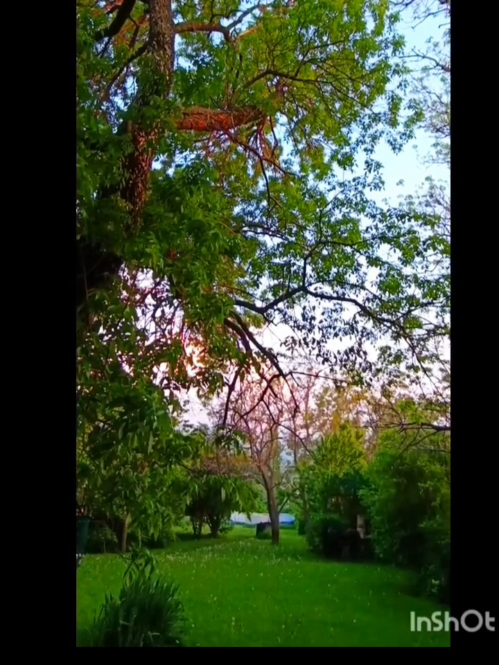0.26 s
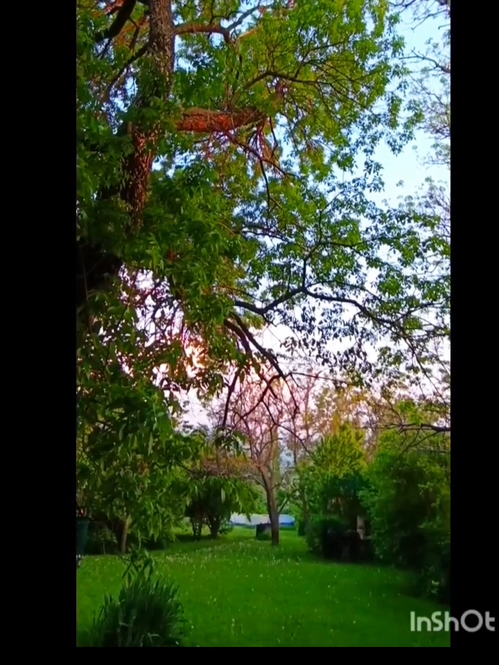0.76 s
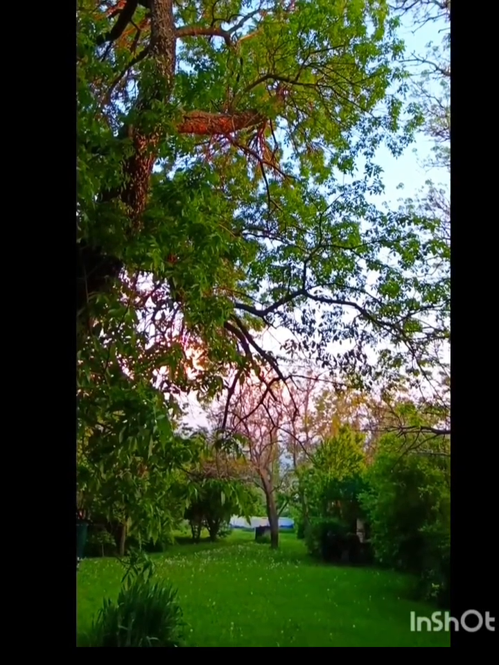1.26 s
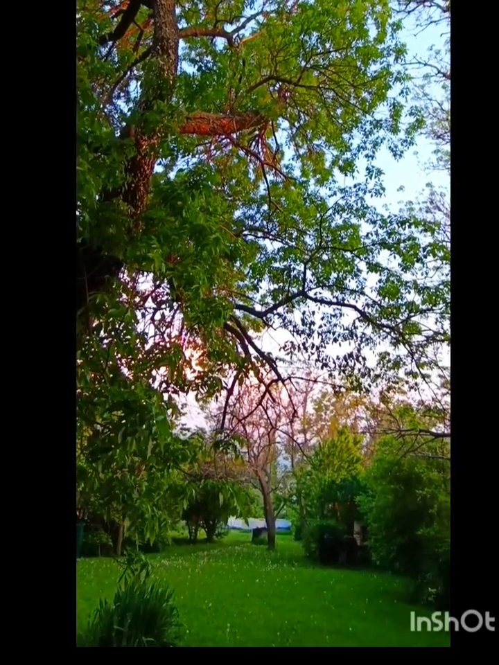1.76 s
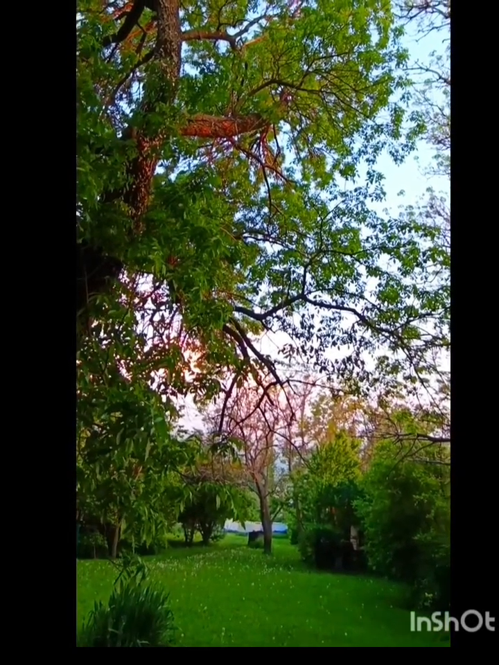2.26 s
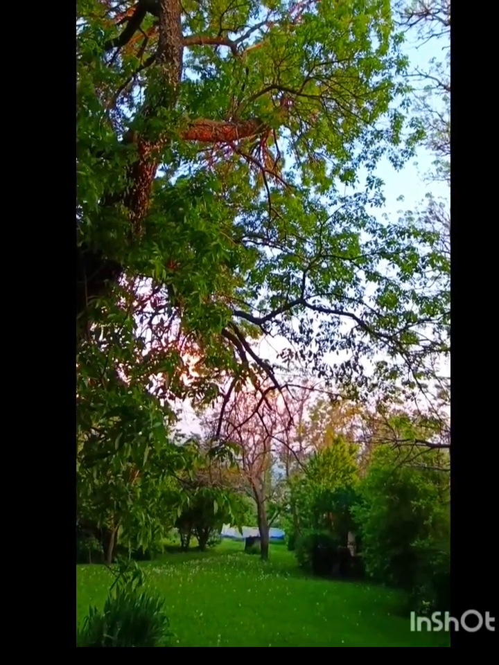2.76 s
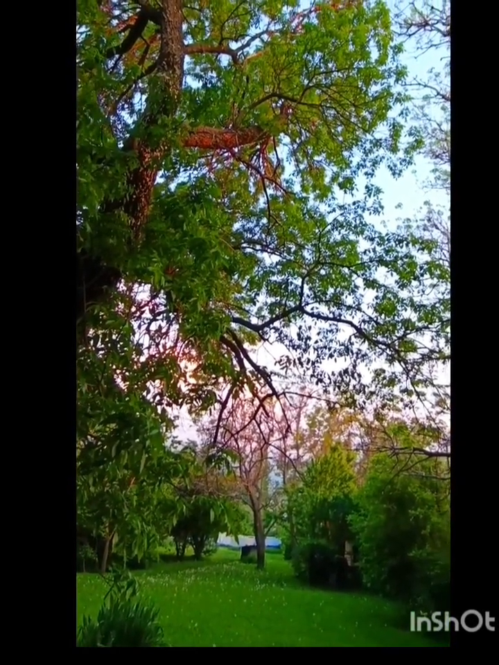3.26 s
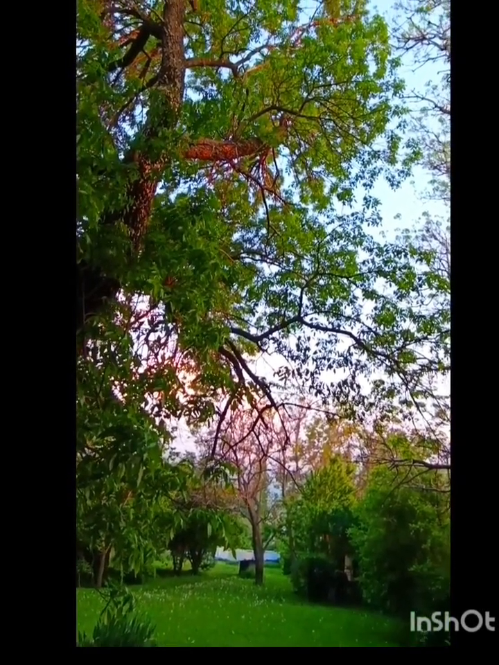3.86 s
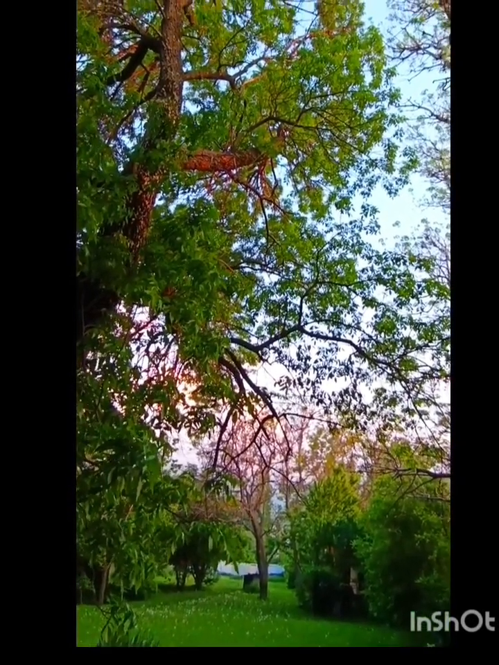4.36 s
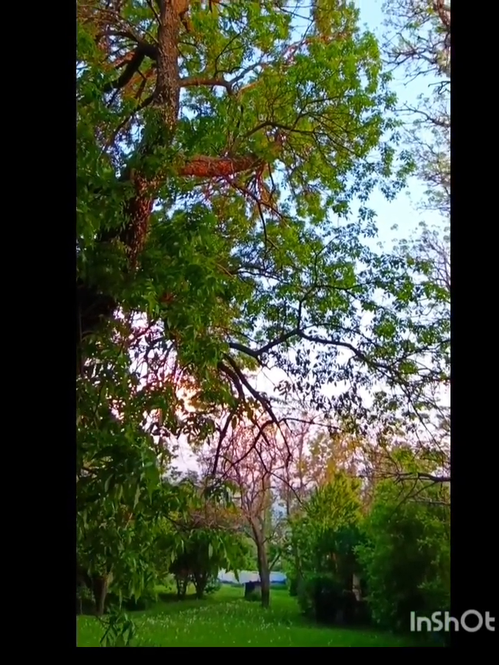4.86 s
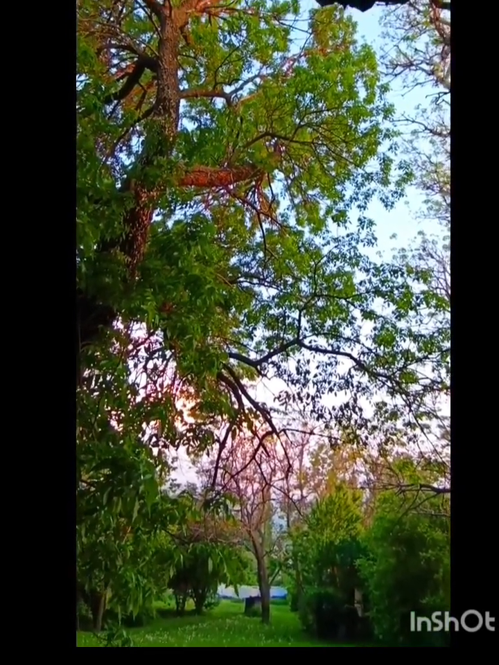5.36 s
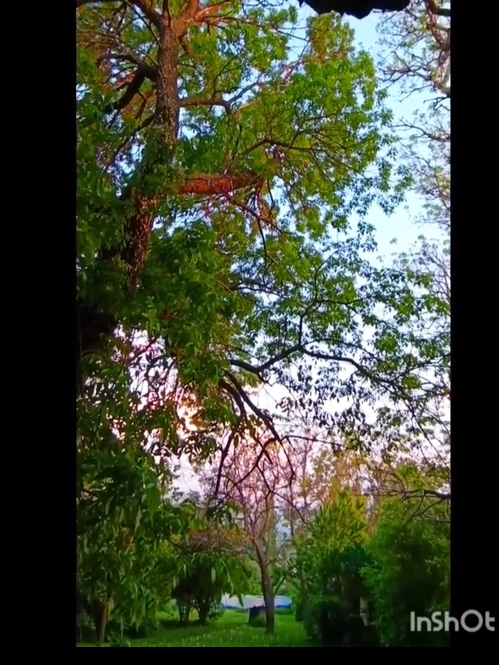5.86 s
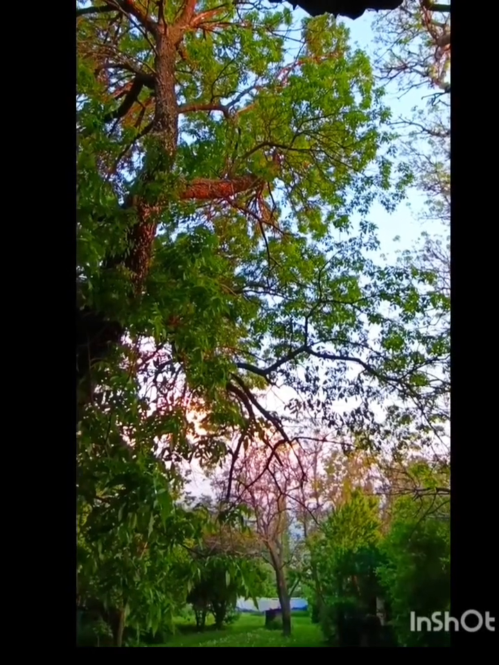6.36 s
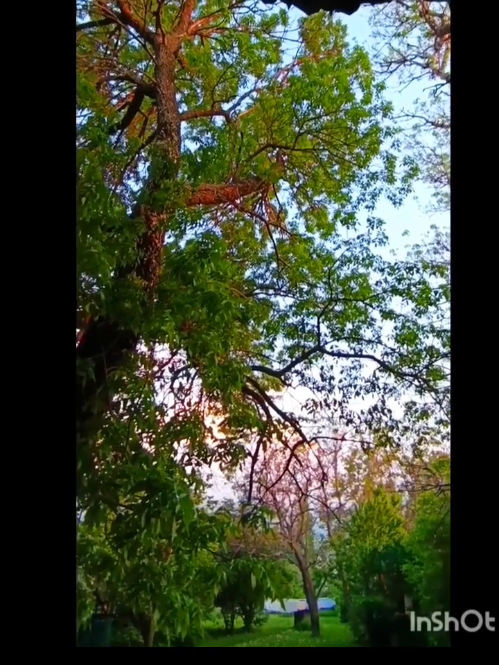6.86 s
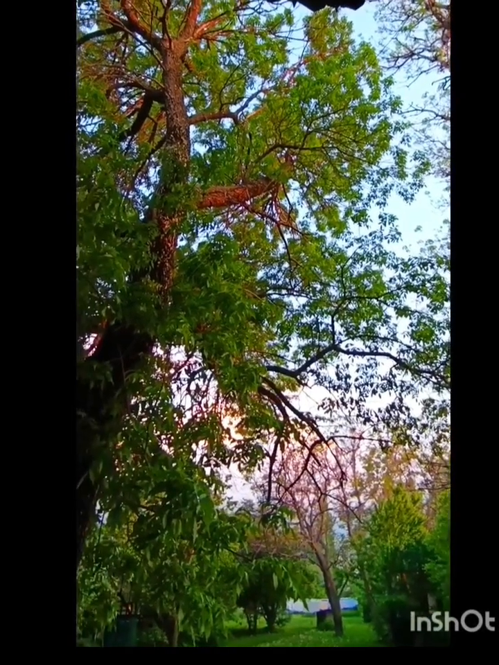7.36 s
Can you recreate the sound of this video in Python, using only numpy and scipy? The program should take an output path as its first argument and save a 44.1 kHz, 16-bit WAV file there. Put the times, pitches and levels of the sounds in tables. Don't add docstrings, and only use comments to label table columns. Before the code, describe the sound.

A near songbird gives short buzzy, squeaky phrases in a garden, while a neighbour repeats falling slurs, a far crow caws and bill snaps rattle.

```python
import sys
import numpy as np
from scipy import signal
from scipy.fft import rfft, irfft, next_fast_len
from scipy.io import wavfile
from scipy.ndimage import uniform_filter1d, minimum_filter1d

SR = 44100
rng = np.random.default_rng(int(sys.argv[2]) if len(sys.argv) > 2 else 0)


def attenuation_scalar(level_db):
    decades = np.asarray(level_db, float) / 20
    return 10 ** decades


def master_out(mix):
    frames = np.transpose(np.atleast_2d(mix))
    ceiling = np.clip(frames, -1, 1)
    pcm = np.round(ceiling * 32767).astype(np.int16)
    wavfile.write(sys.argv[1], SR, pcm)


N = 336042

# (start [s], length [s], from [Hz], held [Hz], level [dB])
WHISTLES = [
    (0.714, 0.1, 2750, 3070, -26.5),
    (0.89, 0.053, 1730, 1738, -28.5),
    (5.385, 0.095, 2912, 2992, -29.5),
]
# (start [s], length [s], from [Hz], held [Hz], level [dB])
THIN_WHISTLES = [(1.21, 0.048, 3300, 3745, -44.5), (1.775, 0.026, 3700, 3720, -57),
                 (3.81, 0.037, 1770, 1725, -36.5), (6.73, 0.09, 3010, 2900, -60.5),
                 (7.585, 0.035, 3900, 4050, -59), (7.585, 0.032, 5770, 6160, -50.5)]
# (time [s], pitch [Hz], level [dB])
TUNES = [
    [(.645, 1658, -28), (.663, 1803, -25.5), (.669, 2870, -17.5), (.68, 2515, -19), (.69, 3083, -23.5),
     (.701, 2730, -16.5), (.709, 1930, -10)],
    [(4.03, 2182, -55), (4.042, 2200, -35.5), (4.092, 2228, -40.5), (4.194, 2344, -44.5),
     (4.334, 2428, -40), (4.41, 2395, -50), (4.46, 2346, -58)],
    [(4.095, 2380, -35), (4.125, 2994, -53), (4.19, 3200, -61), (4.24, 2600, -41), (4.28, 1990, -32),
     (4.325, 1670, -38), (4.385, 1670, -62)],
    [(4.585, 1989, -42.5), (4.695, 1955, -35.5), (4.725, 2090, -30), (4.755, 2670, -33.5),
     (4.778, 3184, -32.5), (4.85, 3220, -38), (4.9, 3160, -51)],
]
# (start [s], length [s], from [Hz], to [Hz], level [dB])
PIPS = [(0.296, 0.0098, 3220, 3200, -26), (0.6777, 0.017, 6100, 6060, -31),
        (.6785, 0.018, 9240, 9030, -39.5), (0.70, 0.016, 1534, 1810, -30),
        (.7115, .0145, 2130, 2290, -25.5), (.722, 0.016, 6100, 6114, -26.5),
        (0.957, .013, 3400, 3040, -25.5), (.96, .012, 7100, 6900, -40), (.275, 0.027, 5640, 5460, -32),
        (5.666, 0.016, 5470, 5530, -34), (5.672, 0.014, 4070, 4750, -30), (3.164, .0145, 3890, 4000, -47),
        (3.192, 0.013, 3930, 4560, -49), (3.202, 0.026, 4500, 3570, -48.5), (4.071, 0.02, 2217, 2240, -41),
        (5.322, 0.025, 2000, 2800, -44), (5.351, 0.0055, 3300, 2100, -31), (5.362, .03, 5700, 5820, -41),
        (5.394, 0.015, 5950, 5920, -41), (5.382, .012, 1870, 2490, -25.5),
        (5.695, 0.015, 3410, 2760, -30.5)]
# (time [s], pitch [Hz], level [dB])
OPENING = [(.002, 1773, -32.5), (.025, 1885, -30.5), (.045, 2200, -25.5), (.058, 2300, -40)]
# (start [s], length [s], from [Hz], level [dB])
CHUCKS = [(0.216, 0.048, 1033, -51), (0.628, 0.033, 1233, -53), (5.614, .047, 1134, -51.5)]
# (start [s], length [s], from [Hz], to [Hz], level [dB])
SQUEAKS = [(0.2617, 0.0046, 5080, 5100, -33), (0.279, .004, 5150, 5100, -31),
           (0.284, 0.0078, 4965, 5130, -20), (.2945, .006, 5100, 5060, -30),
           (0.931, 0.0057, 5240, 5050, -28), (0.9395, .016, 5070, 5040, -20),
           (5.65, 0.012, 3960, 5050, -37), (5.671, 0.0054, 5300, 5150, -34)]
# (start [s], length [s], from [Hz], to [Hz], level [dB])
HOARSE = [
    (.255, 0.16, 5030, 4910, -37),
    (.955, 0.1, 5110, 4960, -41),
    (5.68, .085, 4790, 4750, -33.5),
    (6.0, 0.37, 7070, 7230, -54),
]
# (start [s], length [s], from [Hz], to [Hz], level [dB])
BUZZES = [
    (0.031, 0.038, 1503, 1224, -36.5),
    (.306, 0.12, 2457, 2344, -19),
    (.973, 0.12, 2655, 2546, -19.5),
    (3.17, 0.12, 2217, 2170, -49.5),
    (4.99, 0.091, 2157, 1850, -41.5),
    (5.119, 0.14, 1855, 2020, -45.5),
    (5.702, 0.12, 2388, 2285, -18.5),
]
# (start [s], rise [s], length [s], level [dB])
RASPS = [(0.005, 0.026, 0.096, -37), (0.227, 0.017, 0.29, -35), (0.635, 0.11, 0.11, -29.5),
         (0.9, 0.016, 0.2, -29), (5.328, 0.049, 0.082, -38), (5.619, 0.036, 0.28, -38),
         (7.552, 0.075, 0.072, -47.5)]
# (frequency [Hz], density [dB per Hz])
BILL = [(1500, -49), (2800, 17.5), (3700, 12.5), (4600, 7.5), (5400, 6.5), (6500, 4), (8200, -7),
        (10000, -7.5), (11200, -16), (14000, -72)]
# (multiple [ratio], level [dB])
PURE = [(1, -0.5), (2, -26), (3, -31.5)]
PLAIN = [(1, -3), (2, -32), (3, -35)]
MELLOW = [(1, -1), (2, -13.5), (3, -34.5)]
BRIGHT = [(1, 3), (2, -4.5), (3, -16), (4, -39), (5, -38), (6, -35)]
RICH = [(1, 14.5), (2, 21), (3, 7.5), (4, -20)]
SHRILL = [(1, -9), (2, -13)]
FLICK_VOICE = [(1, -0.5), (1.5, -26), (2, -27.5)]

# (start [s], length [s], from [Hz], to [Hz], level [dB])
FAR_WHISTLES = [(0.44, 0.097, 4160, 4120, -56.5), (1.249, 0.047, 2600, 2306, -50),
                (1.415, 0.1, 1576, 1500, -53.5), (1.705, 0.085, 1500, 1550, -49),
                (3.17, .1, 1053, 1021, -53), (3.275, 0.022, 1190, 1190, -53),
                (3.399, 0.066, 1170, 1230, -52), (3.987, 0.068, 1447, 1490, -46.5),
                (3.997, 0.041, 1680, 2150, -41), (4.334, 0.074, 914, 860, -50.5),
                (4.246, 0.13, 1226, 1243, -52.5), (4.462, 0.11, 1206, 1450, -53.5),
                (4.464, 0.071, 2440, 2770, -52.5), (4.72, 0.15, 1984, 2000, -44.5),
                (4.874, 0.15, 1195, 1438, -51), (5.249, 0.031, 2450, 2700, -54),
                (5.321, 0.033, 1190, 1450, -43.5), (6.738, 0.03, 1256, 1284, -48)]
# (time about its peak [s], pitch [Hz], level [dB])
SLUR = [(-.09, 2341, -4.5), (-.07, 2648, -8.5), (-.045, 2882.5, -6), (-.02, 3012.5, 4), (0, 2891, 1.5),
        (.01, 2592.5, 5), (0.019, 2018, 8), (.031, 1713, 1.5), (.042, 1558, -10)]
# (time [s], level [dB], pitch factor [ratio])
SLURS = [(1.367, -42.5, 0.98), (1.621, -43, 0.98), (1.873, -41, 0.98), (2.136, -42, 0.97),
         (2.419, -43.5, 0.97), (2.696, -44.5, 0.97), (3.0, -43, 0.95)]
# (time after start [s], length [s], from [Hz], to [Hz], level [dB])
FLICKS = [(-.012, 0.023, 3880, 4250, -9), (.008, 0.0197, 4070, 4726, 3.5), (0.027, 0.024, 4146, 4845, 6),
          (0.044, .016, 4330, 4780, -0.5), (0.052, .02, 4600, 4950, 2.5), (.066, 0.018, 5050, 5200, -8),
          (.035, .04, 3930, 4196, -6)]
# (time [s], level [dB], pitch factor [ratio])
TRILLS = [
    (4.462, -55.5, 1),
    (4.56, -41.5, 0.97),
    (4.69, -34.5, 0.99),
    (4.832, -33, 0.99),
    (4.977, -32, 1.01),
    (5.135, -50, 0.91),
]
# (time [s], level [dB], bill opening factor [ratio])
WHEEZE = [(3.35, -72, 1.0), (3.444, -40.5, 0.88), (3.47, -45.5, 0.93), (3.56, -33.5, 0.97),
          (3.772, -25.5, 0.94), (3.85, -31.5, 1), (3.95, -46.5, 0.97)]
# (frequency [Hz], density [dB per Hz])
WHEEZE_AIR = [(410, -36), (700, -5), (1090, -7.5), (1250, 1), (2030, 4.5), (2680, -5), (3150, -1),
              (7200, -10.5), (8800, -23), (10100, -25), (14000, -31)]

# (start [s], length [s], level [dB])
CAWS = [
    (0.841, 0.36, -39.5),
    (4.239, 0.11, -46),
    (5.781, .76, -36),
    (6.547, 0.096, -44.5),
]
# (frequency [Hz], width [Hz], level [dB])
CROW_THROAT = [(803, 130, -3.5), (1250, 260, 2.5), (1645, 290, 3), (2200, 440, -0.5), (2600, 720, -16)]

# (time [s], peak level [dB])
TICKS = [
    (1.2132, -22.5),
    (6.5168, -24.5),
    (6.5544, -25),
    (6.5814, -24.5),
    (6.606, -25.5),
    (6.6345, -28.5),
]
# (frequency [Hz], density [dB per Hz])
SNAP = [(3000, -40), (7000, -20), (8500, -8), (10200, 0), (13000, -8)]
# (frequency [Hz], density [dB per Hz])
RATTLE = [(2000, -44), (3400, -0.5), (3890, -24), (4160, 4.5), (4730, 0.5), (5180, -4.5), (6780, 0.5),
          (8630, -15), (10600, -14.5), (13000, -18)]
# (start [s], length [s], level [dB])
RUSTLES = [(2.294, 0.052, -47.5), (2.6, 0.17, -47.5), (3.087, 0.091, -48.5), (7.032, 0.078, -53.5),
           (7.36, 0.063, -52)]
# (frequency [Hz], density [dB per Hz])
LEAVES = [(200, 12.5), (900, 5), (3500, 1), (6500, -2.5), (9000, -41)]
# (start [s], length [s], level [dB])
WINGS = [(1.284, 0.054, -51), (1.647, 0.055, -52.5), (2.709, 0.046, -51), (2.93, 0.036, -52.5),
         (5.333, 0.052, -67)]

# (frequency [Hz], decay by 60 dB [s])
GARDEN = [(500, 0.27), (2000, 0.65), (5000, 0.61), (12000, 0.47)]
# (delay [s], level [dB])
ECHOES = [
    (0.0248, -4),
    (.033, -10),
    (0.047, -20),
    (.07, -23),
]

# (frequency [Hz], density [dB per Hz])
HUM = [(18, -45), (30, -3), (95, 12.5), (153, 1), (512, -7.5), (780, -8), (913, -11), (1390, -9.5),
       (2750, -17), (3220, -21), (5740, -28), (8080, -30), (10200, -41), (14800, -29), (16000, -27)]
# (time [s], level [dB])
SWELL = [(0.0, -50.5), (0.8, -50), (0.91, -46.5), (1.42, -53), (2.01, -52.5), (2.25, -56), (3.52, -54),
         (3.73, -51.5), (4.31, -51.5), (4.46, -53.5), (4.88, -52), (5.39, -57), (5.94, -46.5), (6.51, -51),
         (7.21, -55), (7.62, -51)]
# (time [s], level [dB])
RUMBLE = [(0.0, -53), (0.45, -47), (0.47, -54), (0.8, -52), (0.87, -59), (0.91, -41), (0.98, -54.5),
          (1.76, -56.5), (1.78, -52), (3.73, -58), (3.84, -44), (3.9, -52.5), (4.52, -58.5), (5.35, -57),
          (5.37, -47.5), (5.69, -58.5), (6.41, -56.5), (7.62, -61.5)]
# (frequency [Hz], correlation [-1 to 1])
SAME = [(60, 0.54), (180, 0.64), (550, 0.29), (1650, -0.22), (4970, -0.071), (15000, 0.039)]
# (frequency [Hz], left minus right [dB])
TILT = [(60, -3.5), (240, 0), (950, -1.5), (3770, 0.5), (15000, 0)]
# (frequency [Hz], left minus right [dB])
PORTS = [(500, -12), (1500, -2), (3000, 2), (5000, 1.5), (10000, 4), (14000, 11.5)]
# (frequency [Hz], gain [dB])
MIC = [(100, -9), (7000, 1), (8400, -2.5), (10100, 12), (11500, 4), (16000, -10.5)]


def syrinx(rows, overtones, rough=0.0086, buzz_hz=200., edge=0.089, held=0.51, flutter_db=2.5):
    s, (hz, level_db, *buzz) = unroll(rows)
    hz = uniform_filter1d(hz, 90)
    buzz = np.clip(buzz[0], 0, 1.2) if buzz else 0
    glide_per_s = uniform_filter1d(abs(np.gradient(np.log(hz))) * SR, 200)
    beat = 2 * np.pi * np.cumsum(buzz_hz * (1 + 0.1 * wobble(len(hz), 51.0))) / SR
    shaken_hz = hz * (1 + rough * wobble(len(hz), 420) + 0.11 * buzz * np.sin(beat))
    turns = np.cumsum(shaken_hz) / SR
    tone = 0
    for multiple, db in overtones:
        gain = attenuation_scalar(db - held * glide_per_s * (multiple > 1.2))
        tone = tone + gain * np.sin(2 * np.pi * round(2 * multiple) / 2 * turns)
    tone = np.sqrt(2) * tone * (1 + 0.58 * buzz * np.cos(beat + 0.094))
    level_db = level_db + flutter_db * wobble(len(hz), 140)
    return s, attenuation_scalar(level_db) * tone * signal.windows.tukey(len(hz), min(edge, 1))


def scoop(start, length, from_hz, held_hz, db, fade_db):
    scoop_s = 0.02
    return [(start, from_hz, db - 6), (start + scoop_s, held_hz, db), (start + length, held_hz, db + fade_db)]


def glide(start, length, from_hz, to_hz, db, sag_db, end_db):
    share = np.array([0, 0.13, 0.8, 1])
    return np.c_[start + length * share, from_hz + (to_hz - from_hz) * share,
                 db + np.array([-0.5, 0, sag_db, end_db])]


def whistles(mix):
    for row in WHISTLES:
        voice = BRIGHT if row[0] < 1 else MELLOW
        sound = syrinx(scoop(*row, -24), voice, edge=0.17, rough=0.011, flutter_db=3.0)
        add(mix, *sound, -1.1, -3 if row[3] > 2000 else -14)
    for row in THIN_WHISTLES:
        add(mix, *syrinx(scoop(*row, -4), PURE), .6, -2.5)


def melodies(mix):
    for rows in TUNES:
        start = rows[0][0]
        sound = syrinx(rows, PLAIN, rough=0.013, held=1.8, flutter_db=1.5 if start < 4 else 3.5)
        add(mix, *sound, -.7 if start < 4.3 else 1.1, -4.5 if start < 4 else -.6)
    add(mix, *syrinx(OPENING, MELLOW, rough=.07, held=0.12), -1.1, -7)


def warble(mix):
    share = np.linspace(0, 1, num=40)
    t = share * 0.027
    swing = np.cos(2 * np.pi * (t - .003) * (110 - 300 * (t - .003)))
    rows = np.c_[5.3575 + t, 2350 + 540 * swing, -25.5 - 6 * (1 - share) ** 3]
    add(mix, *syrinx(rows, MELLOW, rough=0.045, held=0.3, edge=0.056, flutter_db=2.0), -.7, -2.5)


def chucks(mix):
    share = np.linspace(0, 1, num=40)
    top_hz = 1670
    for s, length, hz, db in CHUCKS:
        bent_hz = hz + (top_hz - hz) * share ** 1.6
        level_db = db + 5 * share - 16 * (1 - share) ** 3
        rows = np.c_[s + length * share, bent_hz, level_db]
        add(mix, *syrinx(rows, RICH, rough=0.05, held=0.16, edge=0.11), -1.2, -8)


def pips_and_squeaks(mix):
    end_db = -3
    for row in PIPS:
        sound = syrinx(glide(*row, 0, end_db), PURE, rough=0.0053, held=1.9)
        add(mix, *sound, -.7, -1.5 if 3 < row[0] < 4 else -7)
    for row in SQUEAKS:
        add(mix, *syrinx(glide(*row, 0, end_db), SHRILL, rough=.006, held=.02, flutter_db=1.5), 2.2, -11)
    for row in HOARSE:
        rough = .03 if row[0] > 5 else .05
        add(mix, *syrinx(glide(*row, 0, end_db), SHRILL, rough=rough, held=.01), 2.2, -7)


def buzzes(mix):
    for row in BUZZES:
        depth = np.linspace(0.575, 1, num=4)
        depth *= 0.55 if row[2] > 2600 else 1
        rows = np.c_[glide(*row, -1, -35), depth]
        rows[0, 1] *= 1.03
        add(mix, *syrinx(rows, PURE, rough=0.017, buzz_hz=204.4, flutter_db=1.06), -1.3, -7)


def rasps(mix):
    for s, rise, length, db in RASPS:
        t = np.arange(0, length, 1 / SR)
        before = np.clip(1 - t / rise, 0, 1)
        after = np.clip((t - rise) / (length - rise), 0, 1)
        level_db = db - 17 * before - 17 * after ** 1.7
        air = evened(colour(rng.standard_normal(len(t)), BILL))
        add(mix, s, attenuation_scalar(level_db + 1.5) * air * signal.windows.tukey(len(air), .2), 1.5, -6)


def songster(mix):
    for part in (whistles, melodies, pips_and_squeaks, warble, chucks, buzzes, rasps):
        part(mix)


def slurs(mix):
    for s, db, factor in SLURS:
        rows = np.array(SLUR) * [1, factor, 1] + [s, 0, db]
        at, slur = syrinx(rows, [(1, 0), (2, -13)], edge=.1, held=1.6, rough=.006, flutter_db=2.2)
        add(mix, at, slur, .6, -3)
        add(mix, at + .022, attenuation_scalar(-9 + 3.6 * wobble(len(slur), 200)) * slur, -.6, -12)


def trills(mix):
    bend = 0.446
    for s, db, factor in TRILLS:
        for after, length, low_hz, high_hz, flick_db in FLICKS:
            start, top_hz, level_db = s + after, high_hz * factor, db + flick_db
            rows = [(start, low_hz * factor, level_db - 2),
                    (start + bend * length, top_hz * .98, level_db),
                    (start + length, top_hz, level_db)]
            sound = syrinx(rows, FLICK_VOICE, rough=.02, edge=.6, held=.7, flutter_db=2.5)
            add(mix, *sound, 3.5, -9.5)
        size = round(0.097 * SR)
        air = evened(ring(rng.standard_normal(size), 6780, 1700)) * np.hanning(size)
        add(mix, s - .01, attenuation_scalar(db - 20.5) * air, 3.5, -5)


def wheeze(mix):
    s, (level_db, opening) = unroll(WHEEZE)
    size = len(opening)
    turns = np.cumsum(1850 * opening * (1 + 0.078 * wobble(size, 420))) / SR
    air = evened(colour(rng.standard_normal(size), WHEEZE_AIR))
    voice = air + 0.85 * np.sin(2 * np.pi * turns)
    add(mix, s, attenuation_scalar(level_db - 11.5 + 0.6 * wobble(size, 150)) * voice, .3, -9)


def neighbours(mix):
    for row in FAR_WHISTLES:
        add(mix, *syrinx(glide(*row, -1, -11), PURE, rough=0.0074), -.6, -2.5)
    slurs(mix)
    trills(mix)
    wheeze(mix)


def crow(mix):
    caw_hz = 407.5
    for start, length, db in CAWS:
        s, (hz, level_db) = unroll(glide(start, length, caw_hz, caw_hz, db, 0, -5))
        size = len(hz)
        turns = np.cumsum(hz * (1 + 0.0871 * wobble(size, 193.6) + .03 * wobble(size, 12.04))) / SR
        folds = sum(np.cos(2 * np.pi * k * turns) for k in range(1, 10))
        drive = evened(folds) + 2.2 * rng.standard_normal(size)
        opens_db = 1.5 * np.linspace(-1, 1, size)
        throat = 0
        for k, (peak_hz, width_hz, peak_db) in enumerate(CROW_THROAT):
            throat = throat + attenuation_scalar(peak_db + k * opens_db) * ring(drive, peak_hz, width_hz)
        add(mix, s, attenuation_scalar(level_db - 3.5) * evened(throat) * signal.windows.tukey(size, .15), -1.5, -2.5)


def bill_snaps(mix):
    t = np.arange(300) / SR
    for s, db in TICKS:
        lone = s < 2
        burst = rng.standard_normal(len(t)) * attenuation_scalar(-60 * t / 0.0012)
        snap = colour(burst, (SNAP if lone else RATTLE) + [(15000, -37)])
        add(mix, s, attenuation_scalar(db) * snap / abs(snap).max(), .5, -16 if lone else -8)
    s, (level_db,) = unroll([(6.516, -48.5), (6.6, -46.5), (6.655, -50.5), (6.7, -69.5)])
    add(mix, s, attenuation_scalar(level_db) * evened(colour(rng.standard_normal(len(level_db)), RATTLE)), .4, -8)


def hops_and_wings(mix):
    for events, spectrum, wet_db in [(RUSTLES, LEAVES, -7), (WINGS, RATTLE, -6)]:
        for s, length, db in events:
            size = round(length * SR)
            stir = evened(colour(rng.standard_normal(size), spectrum)) * np.hanning(size)
            add(mix, s, attenuation_scalar(db) * stir, .3, wet_db)


def garden(send):
    taps = np.zeros((2, SR))
    at = np.arange(300, SR - 20, 20) + rng.integers(0, 20, (2, (SR - 301) // 20))
    np.put_along_axis(taps, at, rng.choice([-1., 1.], at.shape), 1)
    hz, t, z = signal.stft(taps, SR, nperseg=256)
    tail = signal.istft(z * attenuation_scalar(-60 * t / read(GARDEN, hz)[:, None]), SR, nperseg=256)[1]
    tail /= np.linalg.norm(tail[0])
    smear = 90
    for s, db in ECHOES:
        blur = rng.standard_normal((2, smear)) / np.sqrt(smear)
        tail[:, round(s * SR):][:, :smear] += attenuation_scalar(db) * blur
    return signal.fftconvolve(send[None], tail, axes=1)[:, :N]


def hum():
    frames, hz = N // 256 + 5, np.fft.rfftfreq(1024, 1 / SR)
    t = np.arange(frames) * 256 / SR
    a, b, c, d, patches = rng.standard_normal((frames, 513, 5)).T
    patches_db = 1.6 * evened(uniform_filter1d(uniform_filter1d(patches, 10, 0), 16, 1))
    lumps_db = evened(uniform_filter1d(rng.standard_normal(frames), 18))

    bass = 1 / (1 + (hz[:, None] / 150) ** 4)
    rumble_db = np.interp(t, *np.transpose(RUMBLE)) + 49.8 + lumps_db
    town_db = np.interp(t, *np.transpose(SWELL)) + 52.0
    swell_db = bass * rumble_db + (1 - bass) * town_db / (1 + hz[:, None] / 6000)
    swell_db += -8 * (1 - .4 * bass) * np.clip((t - 6.68) / 0.48, 0, 1)

    same = np.clip(read(SAME, hz), -1, 1)[:, None]
    left = a + 1j * b
    right = same * left + np.sqrt(1 - same ** 2) * (c + 1j * d)
    z = np.array([left, right])
    tilt_db = np.multiply.outer([.5, -.5], read(TILT, hz))[..., None]
    z *= attenuation_scalar(read(HUM, hz)[:, None] + tilt_db + patches_db)
    z /= np.sqrt(np.mean(abs(z) ** 2) * 2 / 1024)
    return attenuation_scalar(-87.5) * signal.istft(z * attenuation_scalar(swell_db), nperseg=1024, noverlap=768)[1][:, :N]


def evened(x):
    return x / np.sqrt(np.mean(x ** 2) + 1e-20)


def read(points, hz):
    f, value = np.transpose(points)
    return np.interp(np.log(hz + 1), np.log(f + 1), value)


def colour(x, points):
    size = next_fast_len(x.shape[-1])
    gain = attenuation_scalar(read(points, np.fft.rfftfreq(size, 1 / SR)))
    return irfft(rfft(x, size) * gain, size)[..., :x.shape[-1]]


def ring(x, hz, width):
    b, a = signal.iirpeak(hz, hz / width, SR)
    return signal.lfilter(b, a, signal.lfilter(b, a, x))


def wobble(size, hz):
    return evened(uniform_filter1d(rng.standard_normal(size), int(SR / hz), mode="wrap"))


def unroll(rows):
    s, *columns = np.transpose(rows)
    t = np.arange(s[0], s[-1], 1 / SR)
    return s[0], [np.interp(t, s, c) for c in columns]


def add(mix, s, sound, seat_db, wet_db):
    at = round(s * SR)
    lag = round(4 * seat_db)
    ways = [(max(lag, 0), seat_db / 2), (max(-lag, 0), -seat_db / 2), (0, wet_db)]
    for row, (late, db) in enumerate(ways):
        part = mix[row, at + late:][:len(sound)]
        part += attenuation_scalar(db) * sound[:len(part)]


def sounding_cells(hz, z):
    band, pair = np.arange(len(hz)) // 8, np.arange(z.shape[2]) // 2
    luck = rng.standard_normal((pair[-1] + 1, band[-1] + 1)).T
    power = np.mean(abs(z) ** 2, axis=0)
    top_hz = 11200
    shrill_db = 10 * np.log10(power[(hz > 9600) & (hz < top_hz)].mean(0) + 1e-20)
    struck = np.convolve(shrill_db > -58.5, np.r_[0, np.ones(14)])[:len(pair)] > 0
    still_shrill = shrill_db > -67 + 4 * luck[band // 2][:, pair]
    top = struck & still_shrill & (hz > top_hz)[:, None]
    band_power = np.add.reduceat(power, np.arange(0, len(hz), 8))
    band_db = 10 * np.log10(uniform_filter1d(band_power, size=3) + 1e-20)
    below_loudest_db = band_db + minimum_filter1d(-band_db, size=7, axis=0)
    weak = below_loudest_db < -23 + 3 * luck[:, pair]
    return ~(top | weak[band] & ((hz > 5000) & (hz < top_hz))[:, None])


def scene():
    mix = np.zeros((3, N))
    for source in (songster, neighbours, crow, bill_snaps, hops_and_wings):
        source(mix)
    birds = mix[:2] + garden(mix[2])
    birds = [colour(ear, np.array(PORTS) * [1, side]) for ear, side in zip(birds, (.5, -.5))]
    return colour(birds + hum(), MIC)


def band_limit(x):
    return signal.sosfilt(signal.butter(12, 15780, fs=SR, output="sos"), x)


def record(dry):
    highpass = signal.butter(4, 52, "highpass", fs=SR, output="sos")
    hz, t, z = signal.stft(signal.sosfilt(highpass, dry), SR, nperseg=1024)
    z *= sounding_cells(hz, z)
    z[:, hz > 15780] = 0
    mix = signal.istft(z, SR, nperseg=1024)[1][:, :N]
    return band_limit(mix)


dry = scene()
out = record(dry)
master_out(out)
```